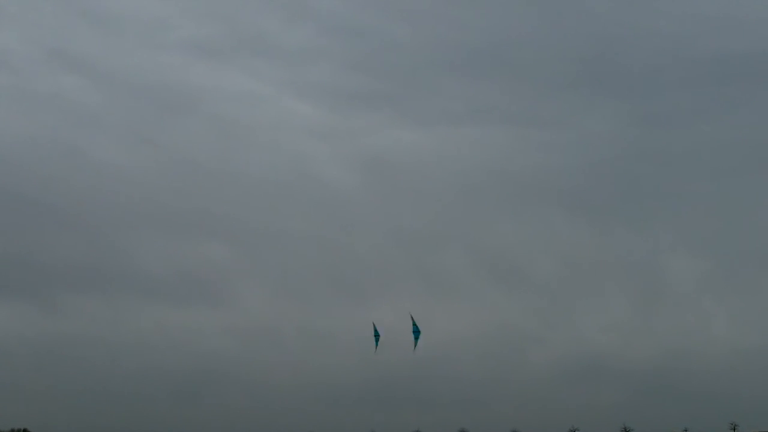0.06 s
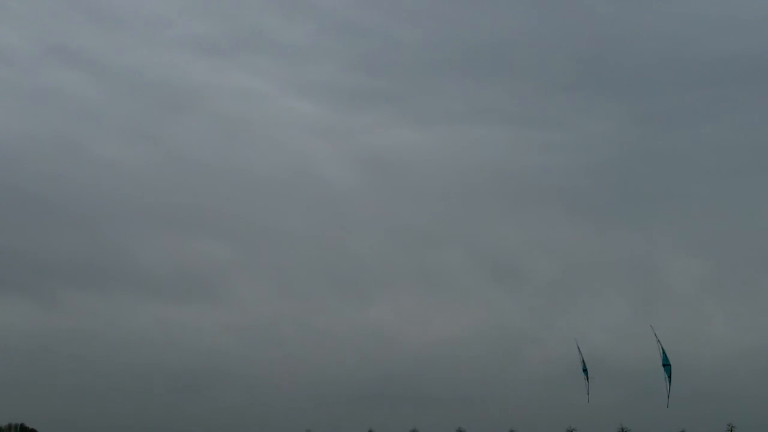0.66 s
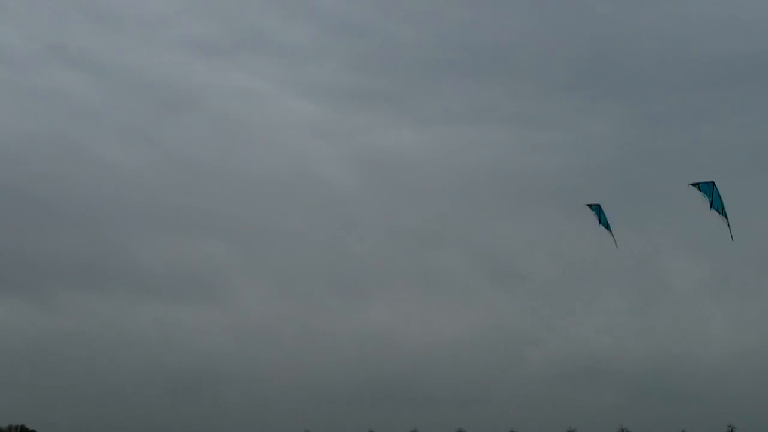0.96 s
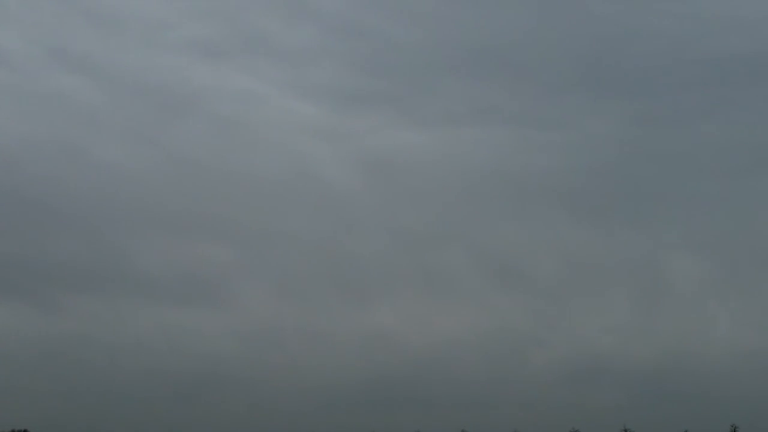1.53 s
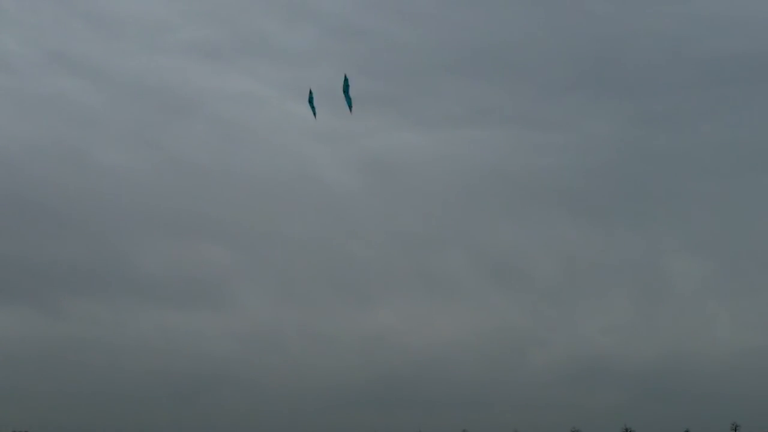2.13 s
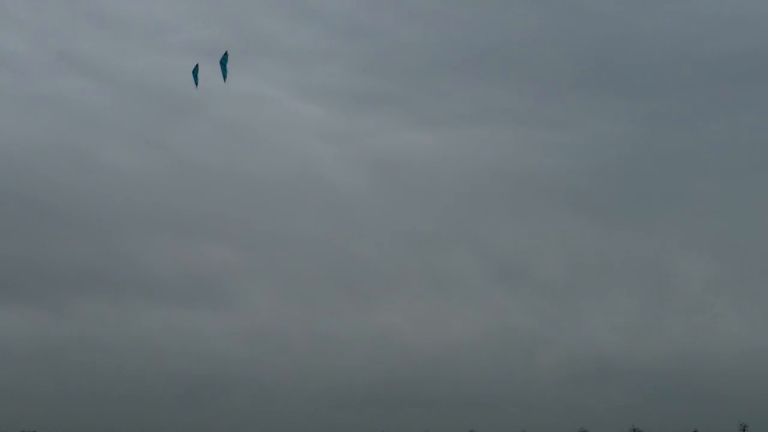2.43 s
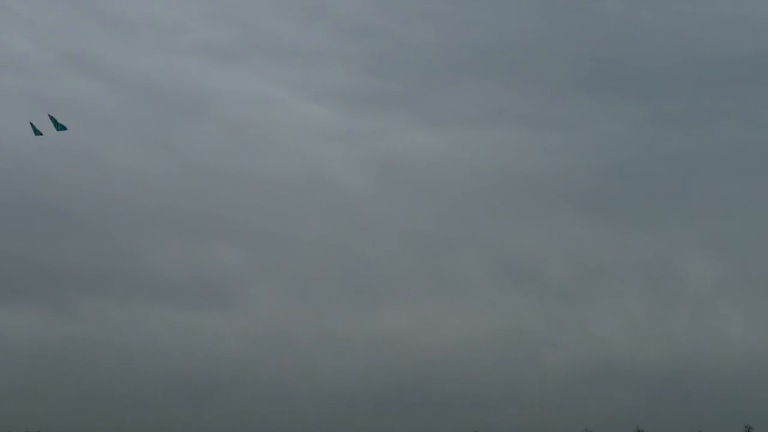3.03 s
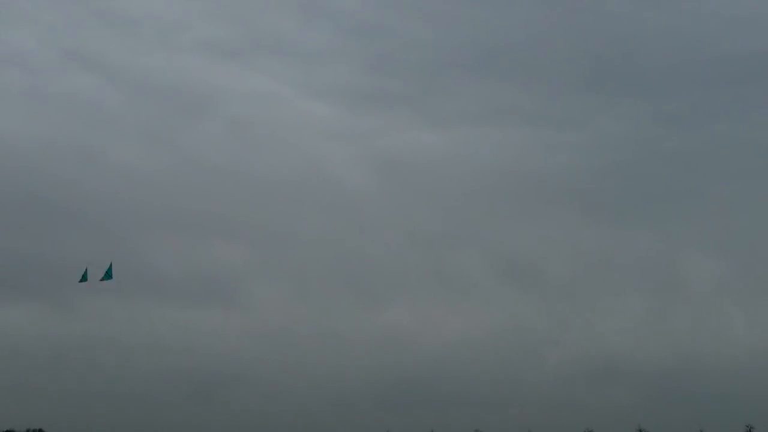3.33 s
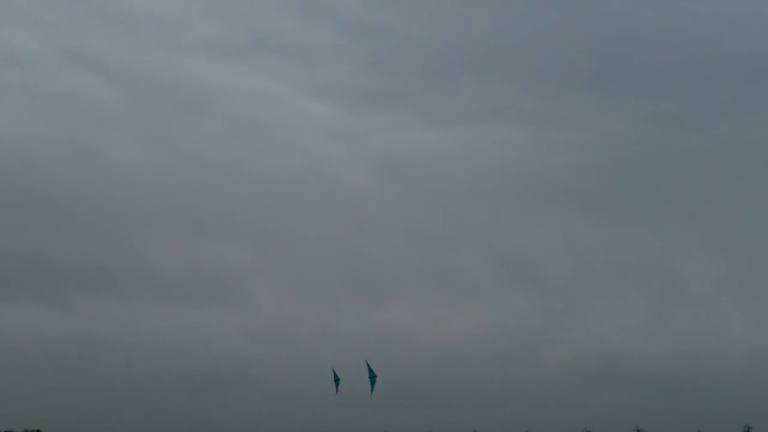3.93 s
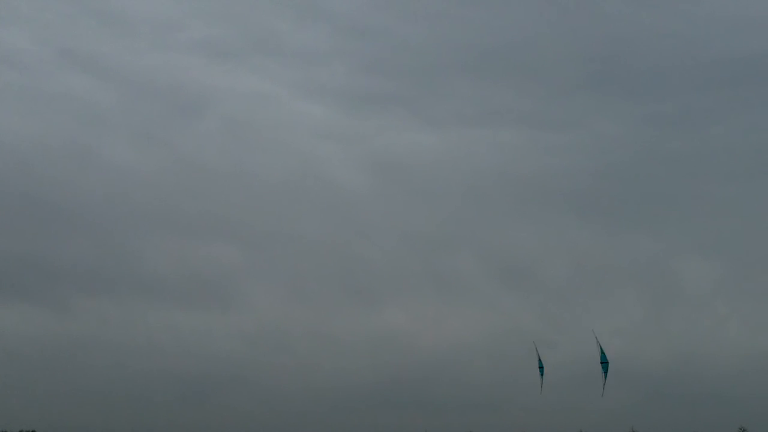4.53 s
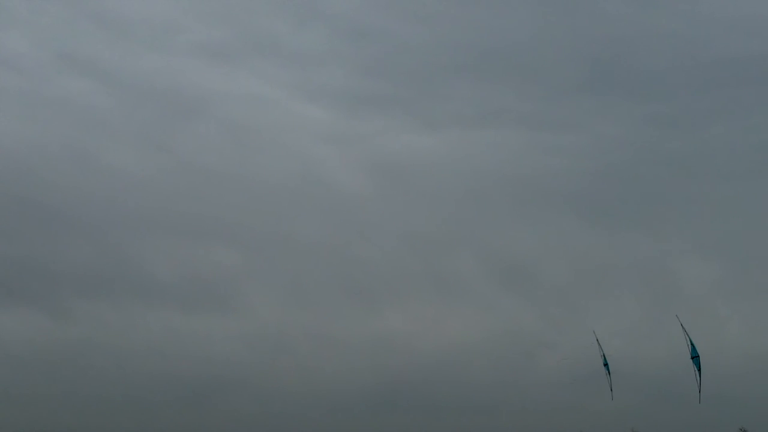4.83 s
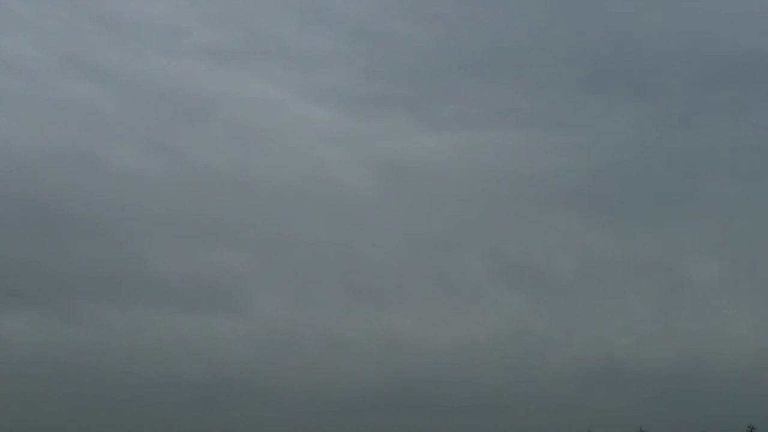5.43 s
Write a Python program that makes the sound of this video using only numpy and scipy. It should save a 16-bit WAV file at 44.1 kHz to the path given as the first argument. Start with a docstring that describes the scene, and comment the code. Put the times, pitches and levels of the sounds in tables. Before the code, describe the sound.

Wind buffets the microphone outdoors, with the airy rush and gliding whistle of two looping kites behind it.

```python
"""A gust rumbles on the microphone, and through it come the hum, whistle and rush of two stunt kites
looping over an open field. Their lines and edges shed eddies at a rate proportional to the air speed,
so the tones glide as the kites speed up and slow down. Turbulence in the same wind strikes the
microphone: large eddies thump, small ones pop, and the recorder's limiter crackles on the biggest."""
import sys
import numpy as np
from scipy import signal
from scipy.fft import rfft, irfft, next_fast_len
from scipy.io import wavfile
from scipy.ndimage import uniform_filter1d, minimum_filter1d, map_coordinates

SR = 44100
rng = np.random.default_rng(int(sys.argv[2]) if len(sys.argv) > 2 else 0)


def log_audio(samples):
    """Write samples as a 16-bit WAV file to the path given in sys.argv[1]."""
    # one column per channel
    frames = np.atleast_2d(samples).T
    # limit to full scale, then quantise
    limited = np.clip(frames, -1, 1)
    pcm = np.round(limited * 32767).astype(np.int16)
    wavfile.write(sys.argv[1], SR, pcm)


N = 250047
TIME = np.arange(N) / SR

# Levels in the tables are relative: the functions add their own gains.
# Course of the flight: (time [s], whistle pitch [Hz], sail rush level [dB])
FLIGHT_CURVE = [(0, 7040, -63.5), (.22, 7465, -62.5), (.5, 7280, -60), (.9, 6643, -62.5), (1.24, 5676, -61),
                (1.45, 5090, -63.5), (1.7, 4745, -68), (2.0, 5494, -62), (2.45, 6060, -62),
                (2.85, 5569, -67), (3.05, 5154, -71.5), (3.35, 4900, -74), (3.85, 5890, -67.5),
                (4.25, 6363, -66.5), (4.7, 6436, -62.5), (5.15, 5710, -69), (5.45, 5255, -71),
                (5.67, 4633, -65)]
# The lines sing out as the kites bank: (time [s], peak level [dB], half-length [s])
TURN_SWELLS = [(1.22, -40, .16), (1.41, -44, 0.054), (1.967, -57.5, 0.16), (2.549, -56.5, .22),
               (2.87, -62, 0.097), (3.524, -62.5, 0.13), (3.868, -59, 0.13), (5.186, -51, 0.087),
               (5.35, -40, 0.031), (5.51, -43, 0.084)]
# Hum of the taut bridles and spars: (time [s], hum level [dB], overtone level [dB])
HUM_LEVELS = [(0, -47.5, -72), (.45, -46.5, -56.5), (.88, -56.5, -55.5), (1.15, -53, -73), (1.65, -63, -65),
              (2.05, -53.5, -65), (2.7, -57, -60), (3.5, -72, -72.5), (4.1, -51, -53), (5.0, -59.5, -64),
              (5.67, -40.5, -62)]
# Steady wind on the microphone: (time [s], rumble level [dB], buffet level [dB])
STEADY_WIND = [(0.0, -31.5, -55), (0.69, -26.5, -41), (0.9, -36, -53), (1.14, -26.5, -64), (1.31, -17, -49),
               (1.44, -20, -31), (1.64, -34, -48.5), (1.89, -32, -53), (2.57, -28.5, -42),
               (2.76, -26, -41.5), (3.02, -25, -38), (3.5, -29, -43.5), (3.81, -17, -23),
               (4.07, -22.5, -36.5), (4.48, -18.5, -27.5), (4.8, -24.5, -37), (5.18, -15.5, -21),
               (5.67, -12, -27)]
# Gusts swelling out of it: (time [s], half-length [s], rumble level [dB], buffet level [dB])
GUST_SWELLS = [(-0, 0.12, -18.5, -33.5), (0.202, 0.034, -20.5, -31), (0.467, 0.02, -19, -30.5),
               (.61, 0.032, -22, -48), (0.827, .02, -26, -45), (1.286, 0.08, -21, -28.5),
               (1.465, 0.028, -18, -28), (1.634, 0.033, -23.5, -37), (1.856, 0.015, -25.5, -52.5),
               (2.35, 0.033, -25.5, -39), (2.464, 0.019, -28, -29.5), (2.601, 0.0073, -24, -49),
               (2.828, 0.025, -22, -34), (3.149, 0.012, -17, -30.5), (3.238, 0.036, -16.5, -25),
               (3.436, 0.016, -17, -28), (3.523, 0.021, -18.5, -32.5), (3.733, 0.029, -21, -13),
               (4.21, 0.013, -23, -33.5), (4.34, 0.039, -21.5, -23.5), (4.48, 0.019, -26, -36),
               (4.718, 0.019, -29, -23), (4.762, 0.02, -6, -21), (5.23, 0.064, -18, -28),
               (5.536, 0.031, -26, -15)]
# Large, slow eddies hitting the microphone: (time [s], peak level [dB])
LARGE_EDDIES = [(1.271, -4), (1.294, -2.5), (1.347, -8.5), (1.417, -2), (2.797, -5.5), (2.905, -2),
                (3.212, 0.5), (3.435, -6), (3.638, -1.5), (3.653, -0.5), (3.722, 5), (3.753, 9), (3.781, 0),
                (4.016, -5), (4.355, -7.5), (4.373, 3.5), (4.46, 0), (4.556, -2.5), (4.624, -2), (4.711, 0),
                (4.759, -4), (4.909, 1.5), (4.924, 3.5), (5.003, -4), (5.09, -4.5), (5.156, 5),
                (5.247, -7.5), (5.315, 2.5), (5.378, 1.5), (5.494, 3), (5.589, -4), (5.625, 5)]
# Small, sharp eddies: (time [s], level [dB], pitch [Hz])
SMALL_EDDIES = [(.012, -13.5, 207), (.197, -22, 150), (.467, -21.5, 164), (1.238, -16, 189),
                (1.271, -9, 236), (1.294, -12.5, 220), (1.347, -9.5, 180), (2.463, -40, 135),
                (2.906, -18.5, 258), (2.977, -23, 140), (2.991, -15, 186), (3.39, -25.5, 214),
                (3.638, -10, 258.4), (3.651, -9.5, 159.3), (3.683, -12.5, 228), (3.697, -15, 172),
                (3.748, 1, 228.5), (3.763, -0.5, 180), (3.799, -23, 222), (3.902, -11, 200),
                (4.017, -11.5, 216), (4.216, -23, 260), (4.286, -25, 169.3), (4.359, -8, 174),
                (4.46, -19, 199), (4.472, -20, 330), (4.487, -11.5, 190), (4.755, -13, 150.8),
                (4.78, -5.5, 167), (4.922, -13.5, 220), (4.938, -11.5, 256), (5.003, -15, 250.7),
                (5.047, -13.5, 235), (5.093, -11, 156), (5.155, -19.5, 170), (5.188, -13, 396),
                (5.206, -15, 226), (5.222, -22, 600), (5.234, -13, 396), (5.257, -12.5, 241),
                (5.375, 2.5, 290.3), (5.535, -12, 372), (5.58, -10.5, 258)]

# Spectra of the kites: (frequency [Hz], spectral level [dB])
WHISTLE_SPECTRUM = [(2950, -23), (3420, -11), (3900, -23), (4800, -9.5), (5550, -2.5), (6200, -9.5),
                    (7100, -26.5)]   # lines at cruising speed
STREAK_SPECTRUM = [(1000, -5), (1500, -5), (2600, -1.5), (3700, -5), (4800, -11.5)]   # edge tones at cruising speed
RUSH_SPECTRUM = [(200, -16.5), (600, -1), (1100, -6.5), (2000, 7), (3300, 3.5), (4800, 4.5), (5800, 4),
                 (6800, -3), (7800, -20), (10000, -43.5)]   # flow over the sails
SWISH_SPECTRUM = [(400, -3.5), (750, 2.5), (1150, 3), (1550, 6.5), (2200, -6.5), (3200, -10), (5000, -17.5)]   # sail cloth
AIR_SPECTRUM = [(5000, -18), (8300, 6), (9600, 5.5), (11500, 2), (12800, -10), (14300, 0), (16000, -17)]   # thin top of the rush
# Spectra of the wind on the microphone: (frequency [Hz], spectral level [dB])
RUMBLE_SPECTRUM = [(12, 0), (25, 5.5), (45, -4), (80, -5.5), (125, -11), (180, -16.5), (300, -50),
                   (600, -56.5)]   # deep turbulence
BUFFET_SPECTRUM = [(70, -6), (140, -3.5), (220, 2), (330, -5.5), (480, -19), (750, -26.5), (1400, -59.5)]   # flapping turbulence
TEARING_SPECTRUM = [(200, 0.5), (420, 5), (650, -4), (1100, -16.5), (1500, -22), (2600, -33.5)]   # tiny eddies
FLUTTER_SPECTRUM = [(250, 4), (600, -1), (1100, -9.5), (1500, -21.5), (2600, -27.5)]   # air around a pop
# Dips in the recorder's response: (frequency [Hz], bandwidth [Hz])
RESPONSE_DIPS = [(4200, 850), (7950, 2630), (8750, 1000), (12700, 410)]

CRUISE_HZ, CRUISE_RUSH_DB = 5553, -65.5   # whistle pitch and rush level at cruising speed


def kite_lines(pitch_hz):
    """Aeolian tones: taut lines shed eddies and whistle in close strands, swelling in every turn."""
    level = np.sqrt(swell_power(*np.transpose(TURN_SWELLS))) * from_db(drift(rate_hz=19))
    return level * vortex_shedding(WHISTLE_SPECTRUM, pitch_hz, ripple_db=4.5, spacing_hz=107.2)


def vortex_shedding(spectrum, pitch_hz, ripple_db, spacing_hz):
    """Strouhal's law: each stretch of line or edge has its own pitch, proportional to the air speed."""
    bins_hz = np.fft.rfftfreq(N, 1 / SR)
    strands = np.interp(bins_hz / spacing_hz, np.arange(1000), rng.uniform(-1, 1, 1000))
    rippled = irfft(rfft(rng.standard_normal(N)) * from_db(ripple_db * strands), N)
    cruising = coloured(rippled, spectrum)
    position = np.cumsum(pitch_hz / CRUISE_HZ) % N   # reading faster raises all pitches together
    return rms_one(map_coordinates(cruising, [position], order=3, mode="wrap"))


def kite_hum(speed_ratio, cruise_hum_hz=699.7, skirt_db=3):
    """Thick parts shed eddies slowly: a breathy hoot and its overtone, higher and purer with speed."""
    hum_db, overtone_db = in_time(HUM_LEVELS)
    pitch_hz = cruise_hum_hz * speed_ratio ** .85
    skirt_gain = from_db(skirt_db) / speed_ratio ** 2.4
    core = aeolian_band(pitch_hz, width_hz=65)
    skirt = skirt_gain * aeolian_band(pitch_hz * 1.06, width_hz=360)
    overtone = aeolian_band(pitch_hz * 1.98, width_hz=440)
    hoot = (core + skirt) / np.hypot(1, skirt_gain)
    return from_db(hum_db) * hoot + from_db(overtone_db) * overtone


def aeolian_band(pitch_hz, width_hz):
    """Shedding is only nearly periodic, so its tone is a band of noise around a moving pitch, rms 1."""
    lowpass = signal.butter(2, width_hz / 2, fs=SR, output="sos")
    in_phase, quadrature = signal.sosfilt(lowpass, rng.standard_normal((2, N)))
    phase = 2 * np.pi * np.cumsum(pitch_hz) / SR
    return rms_one(in_phase * np.cos(phase) + quadrature * np.sin(phase))


def kite_sails(pitch_hz, rush_db, streak_db=-3, rush_gain_db=9.5, swish_gain_db=5.5):
    """Turbulent flow radiates broadband noise: a rush streaked with gliding tones, and a cloth swish."""
    streaks = vortex_shedding(STREAK_SPECTRUM, pitch_hz, ripple_db=11, spacing_hz=61.35)
    rush = noise(RUSH_SPECTRUM) + from_db(streak_db) * streaks
    swish = noise(SWISH_SPECTRUM)
    return from_db(rush_db + rush_gain_db) * rush + from_db(rush_db + swish_gain_db) * swish


def high_air(rush_db, lap_s=4.15, nearest_s=1, air_db=-70.5, air_side_db=-3, rush_side_db=-11):
    """Spherical spreading: the top of the rush falls as 1/distance; a diffuse part gives it width."""
    distance_ratio = 1 - .33 * np.cos(2 * np.pi * (TIME - nearest_s) / lap_s)
    air_gain = from_db(air_db + .16 * (rush_db - CRUISE_RUSH_DB)) / distance_ratio
    diffuse = air_gain * from_db(air_side_db) * noise(AIR_SPECTRUM)
    diffuse += from_db(rush_db + rush_side_db) * noise(RUSH_SPECTRUM)
    return air_gain * noise(AIR_SPECTRUM) + diffuse * [[1], [-1]]


def wind(lumpy_db=7.5, swirl_db=4.5, surge_db=2):
    """Turbulent pressure on the microphone: a deep rumble under buffeting that comes in separate flaps."""
    rumble_db, buffet_db = wind_levels()
    swirl = drift(rate_hz=18.7)
    rumble = from_db(rumble_db + surge_db * swirl) * evened(noise(RUMBLE_SPECTRUM), span_s=.051)
    flaps = from_db(lumpy_db * drift(rate_hz=51)) * noise(BUFFET_SPECTRUM)
    buffet = from_db(buffet_db) * evened(flaps, span_s=.08)
    return rumble + from_db(swirl_db * swirl) * (buffet + tearing(buffet_db))


def wind_levels(thump_stir_db=-25.5, pop_stir_db=-18.5, stir_lag_s=.01):
    """Incoherent powers add: steady wind, gusts and air stirred by each eddy; rumble and buffet in dB."""
    rumble_db, buffet_db = in_time(STEADY_WIND)
    gust_s, half_s, gust_rumble_db, gust_buffet_db = np.transpose(GUST_SWELLS)
    thump_s, thump_db = np.transpose(LARGE_EDDIES)
    pop_s, pop_db, _ = np.transpose(SMALL_EDDIES)
    rumble = from_db(rumble_db + 1) ** 2 + swell_power(gust_s, gust_rumble_db, half_s)
    buffet = from_db(buffet_db - 1) ** 2 + swell_power(gust_s, gust_buffet_db, half_s)
    rumble += swell_power(thump_s, thump_db + thump_stir_db, half_lengths_s=.04)
    buffet += swell_power(pop_s + stir_lag_s, pop_db + pop_stir_db, half_lengths_s=.015)
    return 10 * np.log10(rumble), 10 * np.log10(buffet)


def thumps(pressure, gain_db=-2, width_s=.00226, rebound_db=-6, rebound_s=.00721):
    """A large eddy displaces the gust's pressure with one rounded pulse, then a weaker rebound."""
    out = pressure.copy()
    for time_s, peak_db in LARGE_EDDIES:
        near = np.abs(TIME - time_s) < 10 * width_s
        t = TIME[near] - time_s
        lump, rebound = (1 + (np.array([t, t - rebound_s]) / width_s) ** 2) ** -2
        gust = out[near]
        crest = np.sign(gust @ lump) * from_db(peak_db + gain_db)
        out[near] += (crest - gust) * lump - (crest * from_db(rebound_db) + gust) * rebound
    return out


def pops(pressure, swing_db=5, flutter_db=-10, flutter_s=.0032):
    """A small eddy passes as one sharp bipolar swing of pressure inside a brief flutter."""
    out = np.zeros(N)
    turbulence = evened(noise(FLUTTER_SPECTRUM), span_s=.0076)
    for time_s, level_db, pitch_hz in SMALL_EDDIES:
        near = np.abs(TIME - time_s) < .03
        t = TIME[near] - time_s
        phase = 2 * np.pi * pitch_hz * t
        swing = 2 * phase / (1 + phase ** 2) ** 2
        swing *= np.sign(pressure[near] @ swing) * from_db(swing_db)   # polarity follows the gust
        flutter = from_db(flutter_db) * turbulence[near] * np.exp(-np.abs(t) / flutter_s)
        out[near] += from_db(level_db) * (swing + flutter)
    return out


def tearing(buffet_db, per_s=400, size_db=5, gain_db=-12, strong_db=-32, steepness=.54):
    """Shot noise: tiny eddies tear off at random, their level growing faster than the buffeting."""
    sizes = from_db(size_db * np.minimum(rng.exponential(1, N), 2.5))
    signs = rng.choice([-1, 1], N)
    onsets = rng.random(N) < per_s / SR
    grains = coloured(sizes * signs * onsets, TEARING_SPECTRUM)
    return from_db(buffet_db + gain_db + steepness * (buffet_db - strong_db)) * grains


def from_db(db):
    """Amplitude grows tenfold for every 20 dB."""
    return 10 ** (np.asarray(db) / 20)


def rms_one(x):
    """Normalisation to unit mean power."""
    return x / np.sqrt(np.mean(x ** 2) + 1e-20)


def in_time(rows):
    """Linear interpolation of each column of a curve at every sample."""
    times_s, *columns = np.transpose(rows)
    return [np.interp(TIME, times_s, column) for column in columns]


def drift(rate_hz, stride=40, settle=2000):
    """Low-passed noise wanders slowly, with a spread of 1."""
    pole = np.exp(-2 * np.pi * rate_hz * stride / SR)
    white = rng.standard_normal(N // stride + settle + 2)
    slow = signal.lfilter([1], [1, -2 * pole, pole * pole], white)[settle:]
    return np.interp(np.arange(N) / stride, np.arange(len(slow)), rms_one(slow))


def coloured(x, spectrum):
    """Filtering by multiplication of spectra: a flat signal takes on the given shape, rms 1."""
    padded = next_fast_len(N)
    hz, level_db = np.transpose(spectrum)
    bins_hz = np.maximum(np.fft.rfftfreq(padded, 1 / SR), 1)
    gain = from_db(np.interp(np.log(bins_hz), np.log(hz), level_db))
    gain *= np.minimum(bins_hz / hz[0], 1) ** 2 * np.minimum(hz[-1] / bins_hz, 1) ** 2   # ends roll off
    return rms_one(irfft(rfft(x, padded) * gain, padded)[:N])


def noise(spectrum):
    """Gaussian noise filtered to this spectrum, rms 1."""
    return coloured(rng.standard_normal(N), spectrum)


def evened(x, span_s):
    """Division by the running rms holds the short-term level near 1."""
    return x / np.sqrt(uniform_filter1d(x ** 2, int(span_s * SR)) + .00078)


def swell_power(times_s, levels_db, half_lengths_s):
    """Incoherent sum of Gaussian swells, each falling to 1/e in power a half-length from its peak."""
    power = np.full(N, 1e-14)
    for time_s, db, half_s in np.broadcast(times_s, levels_db, half_lengths_s):
        near = slice(*np.searchsorted(TIME, [time_s - 4 * half_s, time_s + 4 * half_s]))
        power[near] += from_db(db) ** 2 * np.exp(-((TIME[near] - time_s) / half_s) ** 2)
    return power


def scene():
    """Superposition: kites and wind are alike in both channels; only the diffuse rush differs."""
    pitch_hz, rush_db = in_time(FLIGHT_CURVE)
    kites = kite_lines(pitch_hz) + kite_hum(pitch_hz / CRUISE_HZ) + kite_sails(pitch_hz, rush_db)
    pressure = thumps(wind())
    return kites + high_air(rush_db) + pressure + pops(pressure)


def limiter(x, threshold_db=-13, slope=.47, attack_s=.0013, release_db_per_s=170, hold_steps=49):
    """Stepped gain modulates the signal: each quick turn-down crackles, holds, then recovers."""
    step = (TIME * 2400).astype(int)   # 2400 gain steps a second
    starts = np.flatnonzero(np.diff(step, prepend=-1))
    peak_db = 20 * np.log10(np.maximum.reduceat(np.abs(x).max(axis=0), starts) + 1e-9)
    held_db = -minimum_filter1d(-peak_db, size=hold_steps, origin=hold_steps // 2)
    excess_db = np.maximum(held_db - threshold_db, 0)
    recovery_db = release_db_per_s * TIME[starts]
    cut_db = np.maximum.accumulate(slope * excess_db + recovery_db) - recovery_db
    pole = np.exp(-TIME[starts[1]] / attack_s)
    return x * from_db(-signal.lfilter([1 - pole], [1, -pole], cut_db))[step]


def centre_bass(x, below_hz=190):
    """Mid-side filtering: a high-pass on the difference makes the deep bass the same on both sides."""
    mid, side = (x[0] + x[1]) / 2, (x[0] - x[1]) / 2
    side = signal.sosfiltfilt(signal.butter(1, below_hz, "high", fs=SR, output="sos"), side)
    return np.array([mid + side, mid - side])


def record(dry, allpass=.029, cutoff_hz=15800):
    """Final shaping in series: limiter, notches, left-channel lag, bass centred, clipping, low-pass."""
    x = limiter(dry)
    for hz, width_hz in RESPONSE_DIPS:
        x = signal.lfilter(*signal.iirnotch(hz, hz / width_hz, fs=SR), x)
    late_left = signal.lfilter([allpass, 1], [1, allpass], x[0])   # just under one sample
    x = centre_bass(np.array([late_left, x[1]]))
    lowpass = signal.ellip(10, .1, 80, cutoff_hz, fs=SR, output="sos")
    return signal.sosfilt(lowpass, np.clip(x, -1, 1))


dry = scene()
out = record(dry)
log_audio(out)
```